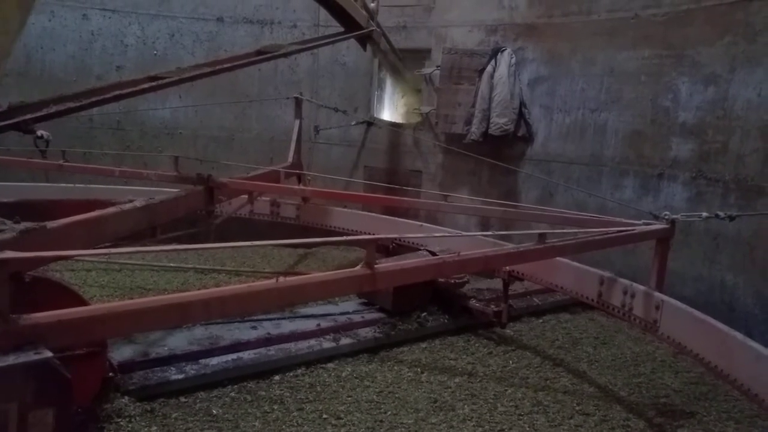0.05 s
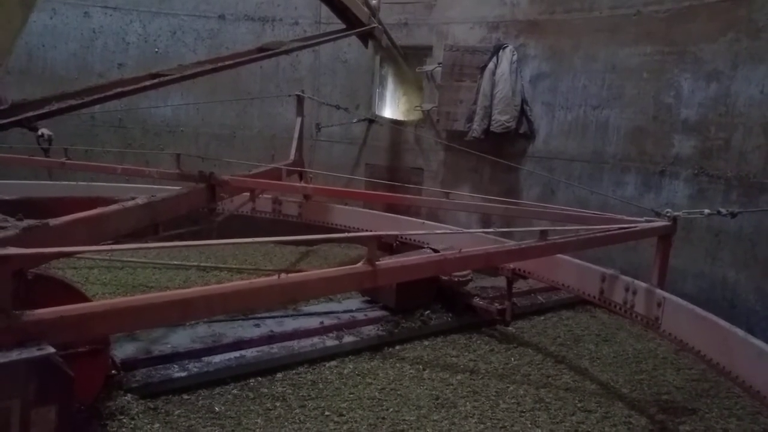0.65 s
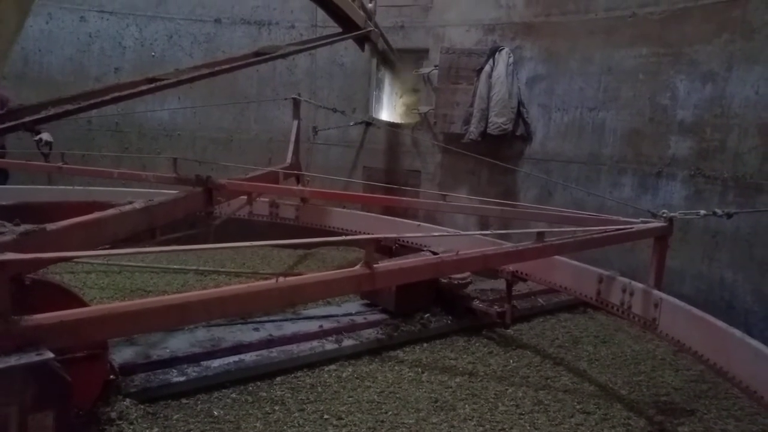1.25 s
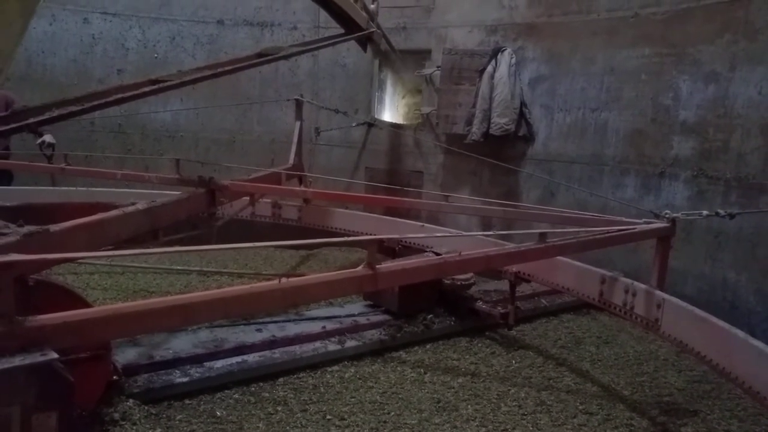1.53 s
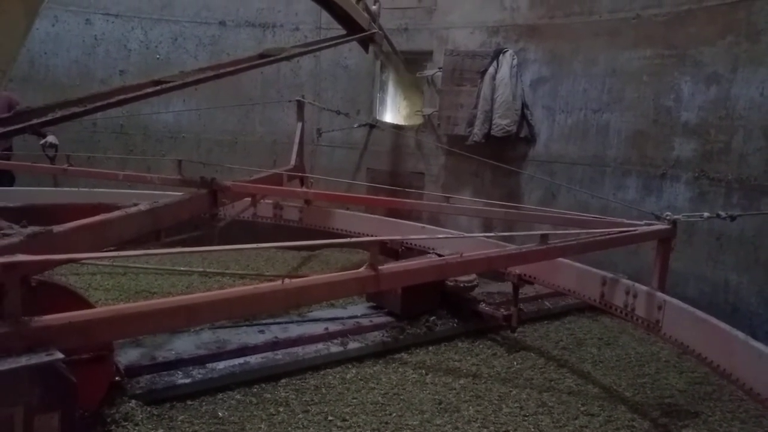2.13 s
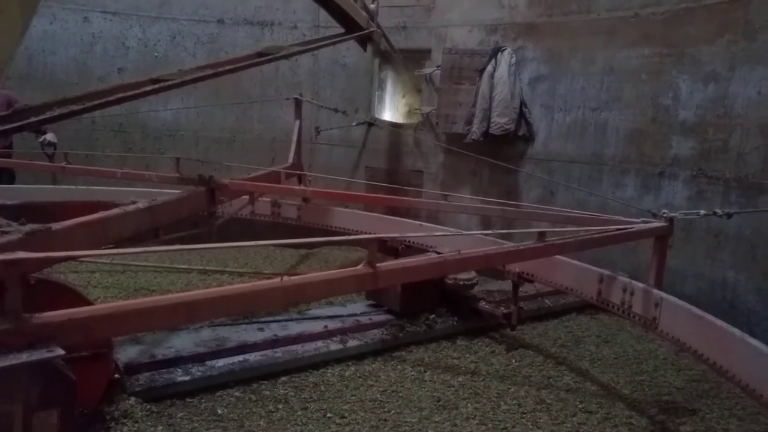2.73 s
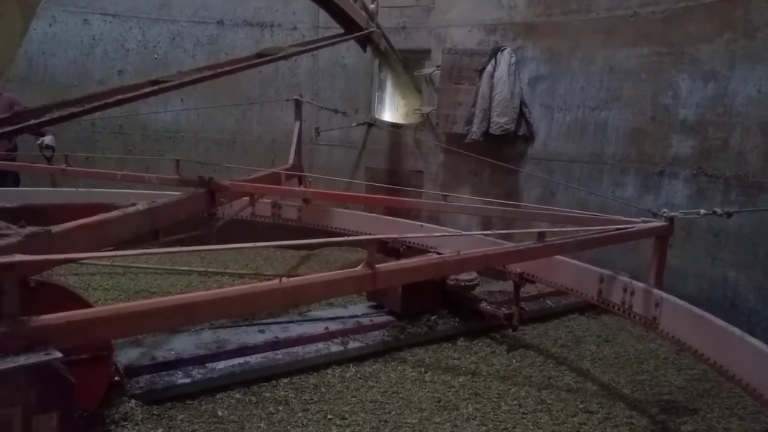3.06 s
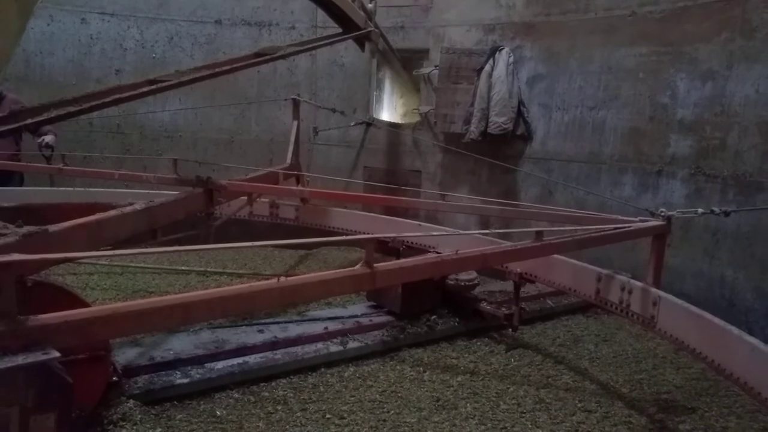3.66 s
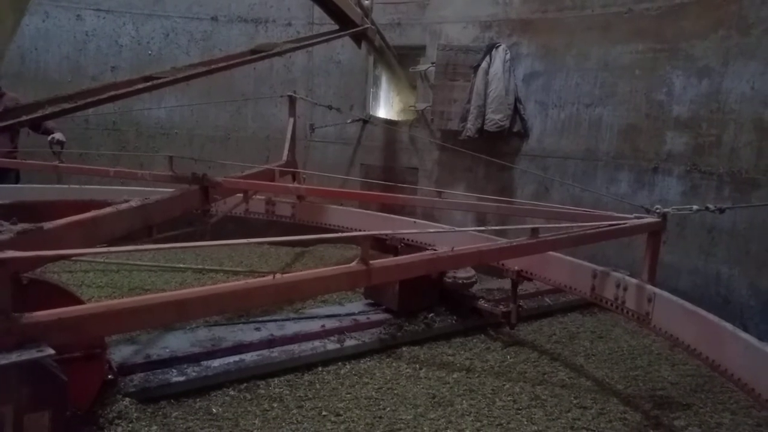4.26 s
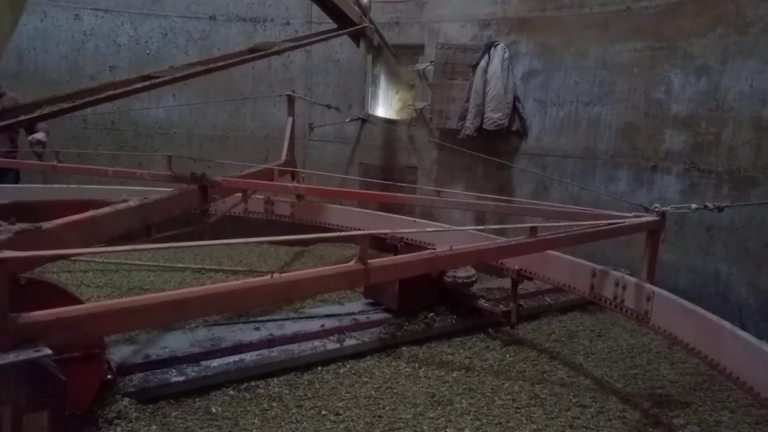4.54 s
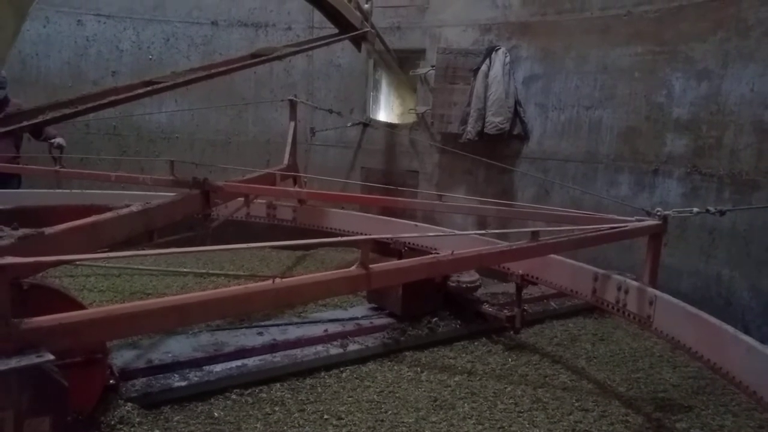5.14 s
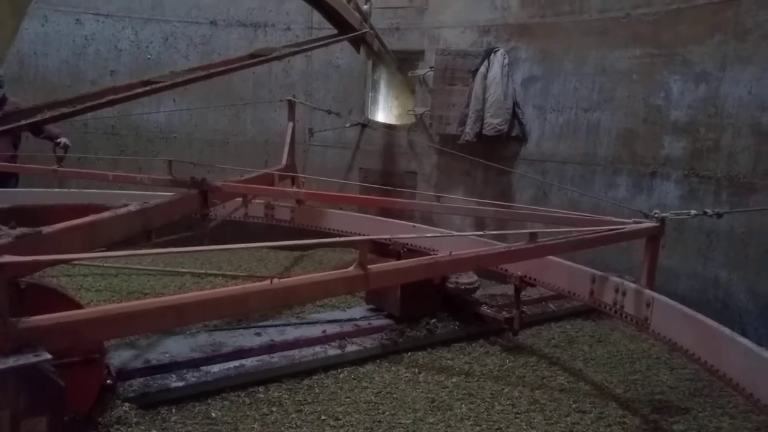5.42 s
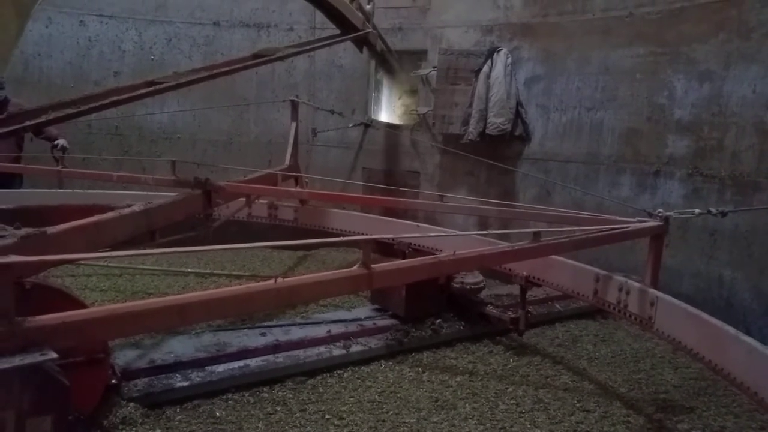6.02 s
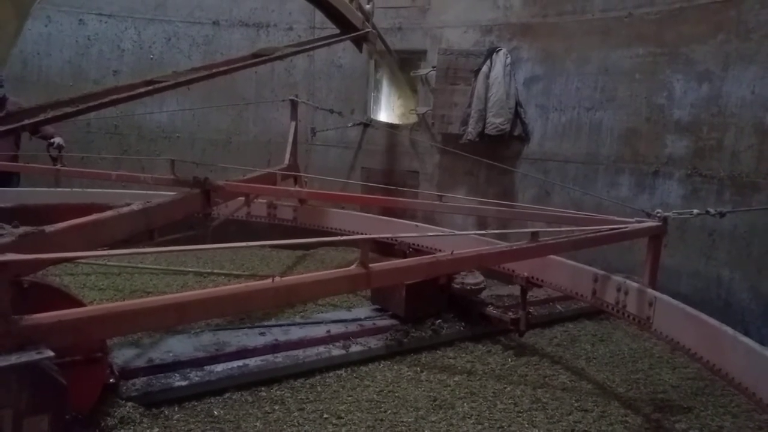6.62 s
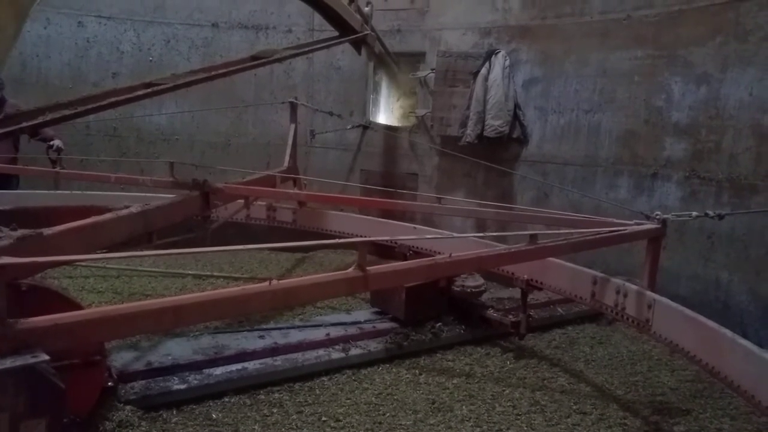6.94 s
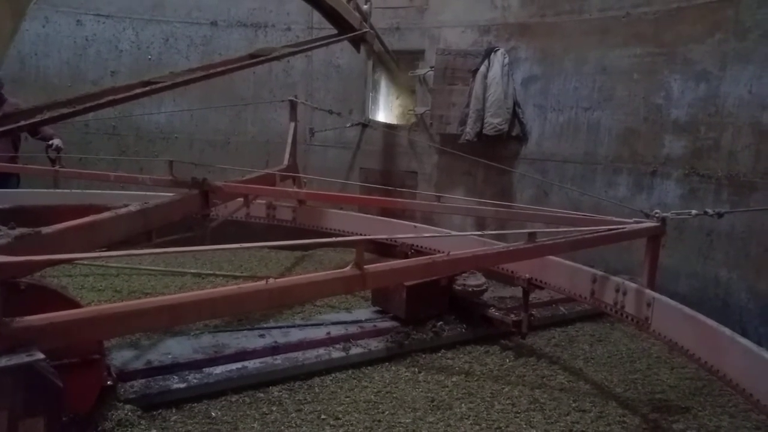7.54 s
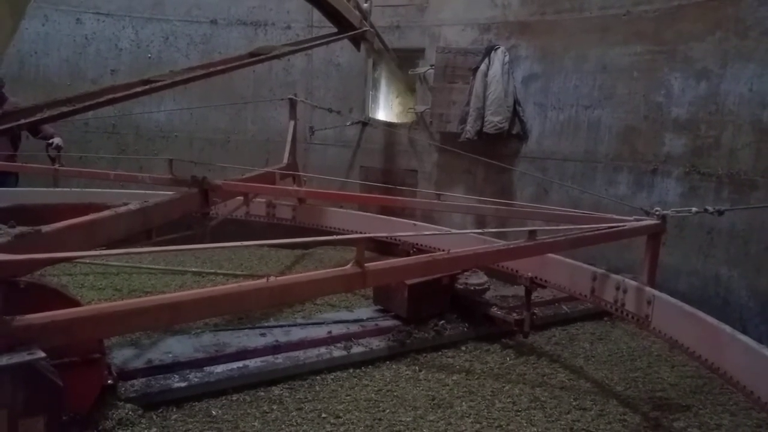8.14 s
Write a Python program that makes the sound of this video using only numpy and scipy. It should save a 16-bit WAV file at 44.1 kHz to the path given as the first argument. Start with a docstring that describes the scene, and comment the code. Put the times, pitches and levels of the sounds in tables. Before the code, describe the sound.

A silo unloader is already running at the start and keeps a loud, steady pace for the whole eight seconds or so. Its blower makes a rich, low drone that throbs about four times a second, with a wavering whine above it and an even drive hum underneath. Augers roar and churn in the silage, ringing off the round concrete wall. Over this, chopped feed rustles and hisses continuously up a steel chute. The roar and hiss swell slightly and irregularly as clumps pass, for instance around 0.4, 1.5, 2.8, 5.2, 7 and 8.2 seconds. Small, bright ticks of kernels striking the chute are scattered between 0.6 and 6 seconds, clearest from about 2.5 to 3.7 seconds. Everything is heard from a few metres away inside the silo, in wide stereo, and the machine is still going at the end.

```python
"""A throbbing drone over a roar and a hiss: a silo unloader at work inside a concrete silo.
The blower turns 52 times a second and drones on its harmonics, which throb with the auger four times
a second. The augers roar in the silage and ring off the round wall, chopped feed hisses and ticks up
the steel chute, and the drive hums. Roar and hiss each surge in their own way as clumps pass.
It is all heard from a few metres away, in widened stereo."""
import sys
import numpy as np
from scipy import signal
from scipy.fft import rfft, irfft, next_fast_len
from scipy.io import wavfile
from scipy.ndimage import uniform_filter1d

SR = 44100
rng = np.random.default_rng(int(sys.argv[2]) if len(sys.argv) > 2 else 0)


def log_audio(samples):
    """Write samples as a 16-bit WAV file to the path given in sys.argv[1]."""
    # one column per channel
    frames = np.atleast_2d(samples).T
    # limit to full scale, then quantise
    limited = np.clip(frames, -1, 1)
    pcm = np.round(limited * 32767).astype(np.int16)
    wavfile.write(sys.argv[1], SR, pcm)


N = 369558
TIME, FREQ = np.arange(N) / SR, np.fft.rfftfreq(N, 1 / SR)


# The drone before its swells. Each row: harmonic of the turn, left level in dB, right level in dB.
BLOWER_HARMONICS = [(1, -58, -46.5), (2, -56, -40), (3, -38.5, -36.5), (4, -42, -37.5), (5, -23.7, -21.2),
                    (6, -46, -30.5), (7, -22.7, -25), (8, -31.5, -24.6), (9, -43, -35.5), (10, -44, -41),
                    (11, -35.8, -40), (12, -26.5, -26.5), (13, -39, -48), (14, -45, -52), (15, -43.5, -46),
                    (16, -47, -49), (17, -48, -46), (18, -54, -53), (20, -45.5, -45), (21, -47, -49),
                    (25, -51, -50), (29, -45.5, -51.5), (30, -48.5, -60)]
# Harmonics that beat against a sideband once per auger turn. Each row: harmonic, sideband above (+1)
# or below (-1), sideband level in dB, time of a crest in seconds, flutter in dB, share of the load surge.
THROBS = [(4, -1, -2.5, 0.15, 1, .2), (5, 1, -9, .16, .75, .1), (7, -1, -17, 0.25, 1.83, .1),
          (8, 1, -6, 0.005, 1.1, .1), (12, 1, -15, 0.082, 2.1, 0)]
# Level ride on the middle tone, the 7th harmonic. Each row: time in seconds, gain in dB.
MIDDLE_TONE_RIDE = [(0.0, 0), (0.68, 0.5), (0.8, -3), (1.24, 2.5), (1.36, 0), (1.72, 4.5), (1.84, -3),
                    (2.0, 5), (2.4, -3.5), (2.64, 2), (2.72, -5), (2.96, 2.5), (3.08, -4), (3.48, 1.5),
                    (3.68, 2), (3.92, 3.5), (4.04, -2), (4.48, 0.5), (4.6, -3.5), (4.72, 1.5), (5.0, -5),
                    (5.16, -0.5), (5.64, 3), (5.76, -7), (5.96, 1.5), (6.28, 2.5), (6.84, -3.0), (6.92, 3),
                    (7.08, -6), (7.28, 5.5), (7.44, 4), (7.52, -5), (7.68, 2), (8.04, -2.0), (8.16, 3.5),
                    (8.37, 1)]
# Level ride on the whine, the 12th harmonic. Each row: time in seconds, gain in dB.
WHINE_RIDE = [(0.0, 1), (0.32, 3.5), (0.68, -2.5), (0.96, 0.5), (1.2, -5), (1.48, 3.5), (1.96, -2.5),
              (2.6, -2.5), (2.8, 5.5), (2.92, -3), (3.36, 2.5), (3.92, -1), (4.08, 5), (4.16, -2),
              (4.32, 5.5), (4.64, -3.5), (4.72, -0.5), (5.08, -1.5), (5.2, 5), (5.6, -3), (5.68, 2.0),
              (5.88, 1), (6.24, 3), (6.36, -4), (6.48, 3), (6.64, -4), (6.92, 0.5), (7.12, -3.5),
              (7.32, -0.5), (7.6, -8.5), (8.04, 5), (8.12, -3.0), (8.24, 2.0), (8.37, -5)]

def blower(turns, turn_hz, load_db, auger_hz=4.047, flutter_rate=26):
    """Paddles push a puff of air every turn: a rich drone that throbs with the auger and grows with load."""
    swells = {}
    for order, side, sideband_db, crest_s, flutter_db, load_share in THROBS:
        beat = 1 + amp(sideband_db) * np.exp(2j * np.pi * np.sign(side) * auger_hz * (TIME - crest_s))
        swells[round(order)] = beat * amp(flutter_db * wander(flutter_rate) + load_share * load_db)
    for order, ride in ((7, MIDDLE_TONE_RIDE), (12, WHINE_RIDE)):
        swells[order] = swells[order] * amp(over_time(ride))
    return machine_tones(BLOWER_HARMONICS, turns, turn_hz, swells, waver_db=2.04, smear=0.57)


# The blower's pace. Each row: time in seconds, turns per second.
BLOWER_SPEED = [(0, 51.99), (.8, 51.79), (1.3, 51.92), (3.7, 51.91), (4.8, 51.96), (6.2, 51.95),
                (7.4, 51.81), (7.7, 51.96), (8.38, 51.97)]

def rotor():
    """The blower shaft drifts slightly in speed; gives the turns made so far and their mean rate in Hz."""
    turn_hz = over_time(BLOWER_SPEED)
    return np.cumsum(turn_hz) / SR, turn_hz.mean()


def machine_tones(harmonics, cycles, base_hz, swells, waver_db, smear, scatter_per_khz=0.64):
    """Harmonics of a turning part; echoes make each waver and diffuse, the higher ones most."""
    out = np.zeros((2, N))
    for order, left_db, right_db in harmonics:
        order = round(order)
        khz = order * base_hz / 1000
        phase = 2 * np.pi * (order * cycles + rng.random()) + smear * np.sqrt(khz) * wander(7)
        envelope = swells[order] if order in swells else amp(waver_db * wander(6))
        scatter = scatter_per_khz * khz
        echoes = scatter * (wander(20) + 1j * wander(20)) / np.sqrt(2)
        tone = np.sqrt(2) * envelope * np.exp(1j * phase) * (1 + echoes) / np.hypot(1, scatter)
        left_lead = over_hz(STEREO_IMAGE, column=2, hz=order * base_hz)
        out[0] += amp(left_db) * tone.imag
        out[1] += amp(right_db) * (tone * np.exp(-1j * left_lead)).imag
    return out


# Tone colour of the augers and blower housing. Each row: frequency in Hz, relative level in dB.
ROAR_SPECTRUM = [(25, -87), (44, -74), (64, -71), (88, -59), (130, -59), (170, -52.5), (250, -50),
                 (350, -44), (440, -44.5), (560, -45), (660, -48.5), (770, -55), (1030, -56.5),
                 (1220, -61.5), (3000, -76.5)]

def augers(turns, load_db, trim_db=0.3):
    """Knives tear at the silage and clods drum in the housing, harder under load."""
    knocks = grains(per_second=1100, spread_db=1.37, ring_s=0.0049)
    rumble = silo_wall(knocks, t60_s=1.67, wet_db=-2)
    pulse = 1 + 0.044 * np.cos(2 * np.pi * 2 * turns)  # twice per blower turn
    churn = patchy(rumble * pulse, lowest_hz=98.0, depth_db=0.87, rate=16)
    return colour(churn, ROAR_SPECTRUM) * amp(trim_db + load_db)


# Tone colour of feed sliding up the chute. Each row: frequency in Hz, relative level in dB.
HISS_SPECTRUM = [(600, -79), (1200, -72.5), (1480, -60), (1950, -63.5), (2300, -65.5), (2700, -64.5),
                 (3200, -63.5), (4100, -63), (4900, -64), (6500, -63.5), (7800, -64.5), (8700, -65.5),
                 (9500, -66.5), (10500, -67.5), (12000, -71.5), (14200, -80)]

def chute(turns, stalks_db, chaff_db, surge_share=0.95, crossover_hz=5500, trim_db=-0.1):
    """Feed is flung against the steel once a turn: coarse stalks rustle, fine chaff hisses above them."""
    stalks = grains(per_second=6500, spread_db=2.5, ring_s=0.0075) * amp(surge_share * stalks_db)
    chaff = grains(per_second=7500, spread_db=2.5, ring_s=0.004) * amp(surge_share * chaff_db)
    coarse = 1 / (1 + (FREQ / crossover_hz) ** 4)
    spray = irfft(np.sqrt(coarse) * rfft(stalks) + np.sqrt(1 - coarse) * rfft(chaff), N)
    fling = 1 + 0.075 * np.cos(2 * np.pi * turns)
    stream = patchy(spray * fling, lowest_hz=1600, depth_db=0.78, rate=28)
    return colour(stream, HISS_SPECTRUM) * amp(trim_db)


# Hard bits hitting the chute. Each row: start in seconds, relative level in dB.
KERNEL_HITS = [(.596, 4), (1.327, 7), (2.02, 7), (2.405, 7), (2.522, 8), (2.712, 10), (2.945, 8),
               (3.58, 10.5), (3.657, 10), (4.448, 8), (4.485, 5), (4.714, 3), (5.12, 5), (5.198, 6),
               (5.409, 8), (5.659, 3), (5.95, 3)]

def kernel_ticks(ring_s=0.0025, spurt_s=0.014, spurt_db=-10, low_cut_hz=4000):
    """Kernels and hard stalks click brightly on the chute; a spurt of chaff scatters after each."""
    hits = np.zeros(N)
    for start_s, level_db in KERNEL_HITS:
        hits[int(start_s * SR)] += amp(level_db)
    envelope = np.hypot(decay(hits, ring_s), amp(spurt_db) * decay(hits, spurt_s))
    clicks = colour(envelope * rng.standard_normal((2, N)), HISS_SPECTRUM)
    return signal.sosfilt(signal.butter(1, low_cut_hz, "high", fs=SR, output="sos"), clicks)


# The drive's hum. Each row: harmonic of the tooth rate, left level in dB, right level in dB.
DRIVE_HARMONICS = [(1, -34.5, -42), (2, -43, -39.5), (3, -51, -47)]

def drive(tooth_hz=230.6):
    """Teeth of the auger drive mesh at their own steady rate."""
    return machine_tones(DRIVE_HARMONICS, tooth_hz * TIME, tooth_hz, {}, waver_db=0.5, smear=0.99)


# Clumps of silage passing through. Each row: centre in seconds, width at half height in seconds,
# then the surge of flow in dB at the augers, in the stalks and in the chaff.
SILAGE_CLUMPS = [(0.17, 0.06, 2.0, 2.0, 1.5), (0.38, 0.16, 2.0, 4, 1.5), (0.6, 0.13, 1, 2, 0.5),
                 (0.78, 0.07, 0.5, 1.0, 2.5), (0.87, 0.08, 1.5, 0.0, 0), (1.05, 0.07, 2.5, 1.5, 3.0),
                 (1.32, 0.06, 1.5, 1.5, 2.5), (1.51, 0.19, 1.5, 3.5, 2.0), (1.66, 0.06, 3, 1, 0.5),
                 (2.09, 0.21, 1.5, 2.0, 2.5), (2.37, 0.11, 1.5, 0, 0), (2.81, 0.23, 2.5, 2.5, 1.5),
                 (2.94, 0.06, 0, 2, 1), (3.2, 0.24, 1.5, 3, 0), (3.38, 0.12, 1.5, 1, -1),
                 (3.56, 0.11, 2, 2.5, 2.5), (3.64, 0.17, 0, 1.0, 1.5), (3.75, 0.09, 0.5, 1.5, 3),
                 (4.13, 0.15, 2.5, 2.5, 0.5), (4.33, 0.1, 3.0, 1.0, -1), (4.47, 0.2, 2.0, 1, 3),
                 (4.99, 0.07, 0.5, -0.5, 2.0), (5.23, 0.21, 2.5, 2.5, 2.5), (5.46, 0.15, 0.5, 1.5, 3),
                 (5.67, 0.11, 0.5, 0.5, 1.5), (6.28, 0.11, 1.5, 2.5, 1.5), (6.56, 0.09, 2.5, 1.5, 1.5),
                 (6.76, 0.07, 2.5, 2, 3), (6.95, 0.088, 3, 3, 3.5), (7.15, 0.15, 1, 1.5, 1),
                 (7.35, 0.07, 1.5, 3.5, 2), (7.48, 0.26, 1.0, 0.5, 1.5), (7.99, 0.18, 2, 2.5, 2.0),
                 (8.2, 0.1, 3, 3, 4)]

def feed_flow(trickle_db=0.38, trickle_rate=24):
    """Clumps swell and pass over an uneven trickle: auger, stalk and chaff flow in dB about the mean."""
    flow_db = np.zeros((3, N))
    for centre_s, width_s, *surges_db in SILAGE_CLUMPS:
        bell = 0.5 ** ((2 * (TIME - centre_s) / width_s) ** 2)
        flow_db += np.outer(surges_db, bell)
    return flow_db - flow_db.mean(axis=1, keepdims=True) + trickle_db * wander(trickle_rate)


def silo_wall(x, t60_s, wet_db):
    """Direct sound plus the dense ring of the concrete wall, at unchanged power."""
    tail = rng.standard_normal((2, N)) * amp(-60 * TIME / t60_s)
    tail /= np.sqrt(np.sum(tail ** 2, axis=1, keepdims=True))
    return irfft(rfft(x) * (1 + amp(wet_db) * rfft(tail)), N) / np.hypot(1, amp(wet_db))


# How the two channels relate. Each row: frequency in Hz, likeness (held between -1, opposed,
# and 1, alike), phase lead of the left channel in radians.
STEREO_IMAGE = [(50, 0.3, 2.05), (100, 0.48, 0.34), (160, 0.62, 0.6), (259, 0.48, 0.74), (354, 0.68, -0.87),
                (430, -0.023, 0.5), (492, 0.55, -0.2), (600, 0.5, -0.43), (845, 0.28, -0.34),
                (1310, 0.017, -0.2), (2042, -0.33, -0.5), (2073, -1.12, -0.4), (2640, -0.99, 0.23),
                (2578, 0.029, -0.1)]

def stereo_spread(x):
    """Lows are much alike in both channels, 2.1-2.6 kHz is set opposed and wide, highs are unrelated."""
    left, unrelated = rfft(x)
    likeness = np.clip(over_hz(STEREO_IMAGE, column=1), -1, 1)
    right = likeness * left + np.sqrt(1 - likeness ** 2) * unrelated
    right *= np.exp(-1j * over_hz(STEREO_IMAGE, column=2))
    return irfft(np.array([left, right]), N)


def grains(per_second, spread_db, ring_s):
    """Dense tiny impacts of uneven size; each dies away as a short burst of noise."""
    struck = rng.random(N) < per_second / SR
    size = amp(spread_db * np.minimum(rng.exponential(size=N), 5))
    energy = decay(struck * size ** 2, ring_s / 2)  # energy fades twice as fast as amplitude
    return unit_rms(np.sqrt(energy) * rng.standard_normal((2, N)))


def patchy(x, lowest_hz, depth_db, rate, bands=4):
    """Let overlapping bands an octave apart wander in level, each on its own."""
    size = next_fast_len(N)
    hz = np.maximum(np.fft.rfftfreq(size, 1 / SR), 1)
    octave = np.clip(np.log2(hz / lowest_hz), 0, bands - 1)
    spectrum, out = rfft(x, size), np.zeros((2, N))
    for band in range(bands):
        share = np.maximum(1 - np.abs(octave - band), 0)
        out += irfft(spectrum * share, size)[:, :N] * amp(depth_db * wander(rate))
    return out


def wander(rate):
    """Smooth random drift of unit rms, with `rate` changes a second."""
    step = max(int(SR / rate), 2)
    knots = rng.standard_normal(N // step + 2)
    ramps = np.interp(np.arange(N) / step, np.arange(len(knots)), knots)
    return unit_rms(uniform_filter1d(ramps, step))


def decay(hits, fade_s):
    """Give each hit an exponential tail with time constant fade_s."""
    return signal.lfilter([1], [1, -np.exp(-1 / (fade_s * SR))], hits)


def colour(x, spectrum):
    """Give a white sound of unit power a spectrum in dB per Hz."""
    return irfft(rfft(x) * amp(over_hz(spectrum, column=1)) * np.sqrt(SR / 2), N)


def over_time(rows):
    """A table of times and values, joined up at every sample."""
    return np.interp(TIME, *np.transpose(rows))


def over_hz(rows, column, hz=FREQ):
    """One column of a frequency table, joined on a log axis."""
    rows = np.array(rows)
    return np.interp(np.log(np.maximum(hz, 1)), np.log(rows[:, 0]), rows[:, column])


def amp(db):
    """Decibels to gain."""
    return 10 ** (np.asarray(db) / 20)


def unit_rms(x):
    """Scale to an rms of one."""
    return x / np.sqrt(np.mean(x ** 2))


def scene():
    """Machine tones over the noise of cutting and throwing feed, surging as clumps pass."""
    turns, turn_hz = rotor()
    load_db, stalks_db, chaff_db = feed_flow()
    noises = augers(turns, load_db) + chute(turns, stalks_db, chaff_db) + kernel_ticks()
    return blower(turns, turn_hz, load_db) + drive() + stereo_spread(noises)


# Stereo widening. Each row: frequency in Hz, share (0-1) of the opposite channel taken out of the left
# channel, share taken out of the right channel.
WIDENING = [(615, 0.21, 0.17), (900, 0.48, 0.7), (1110, 0.86, 1), (1340, 0.28, 0.2), (1970, 0, 0.03),
            (2134, 0.95, 0.91), (3380, 1, 0.86), (4000, 0.4, 0.25), (4570, 0.45, 0.63), (4940, 0, 0.05),
            (6900, 0.3, 0.33), (14000, 0, 0.14)]

def record(dry, lag_s=0.000446, top_hz=14250):
    """Widen with a delayed share of the opposite channel, then soften peaks and dull the highest treble."""
    channels = rfft(dry)
    share = np.clip([over_hz(WIDENING, column=1), over_hz(WIDENING, column=2)], 0, 1)
    delay = np.exp(-2j * np.pi * FREQ * lag_s)
    wide = irfft((channels - share * delay * channels[::-1]) / np.hypot(1, share), N)
    rounded = wide / (1 + wide ** 8) ** (1 / 8)
    return signal.sosfilt(signal.ellip(10, 0.1, 80, top_hz, fs=SR, output="sos"), rounded)


dry = scene()
out = record(dry)
log_audio(out)
```